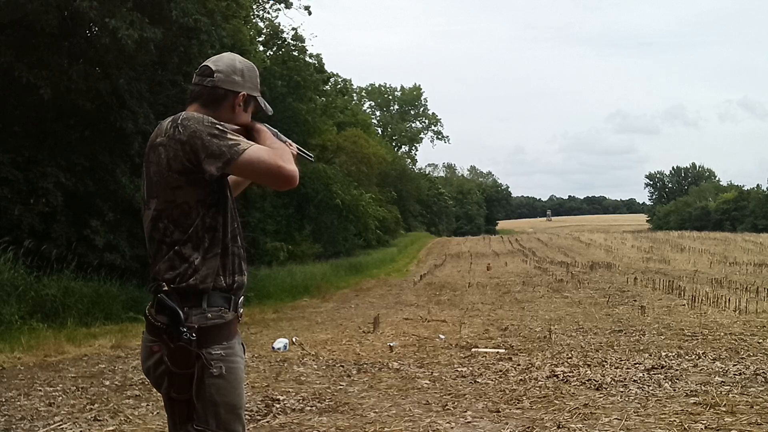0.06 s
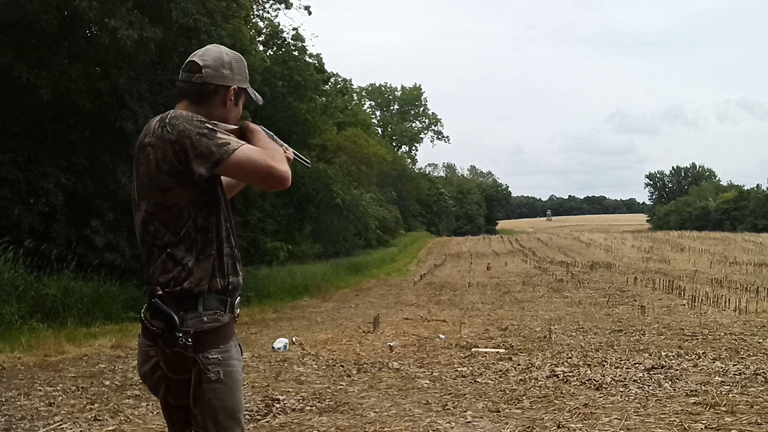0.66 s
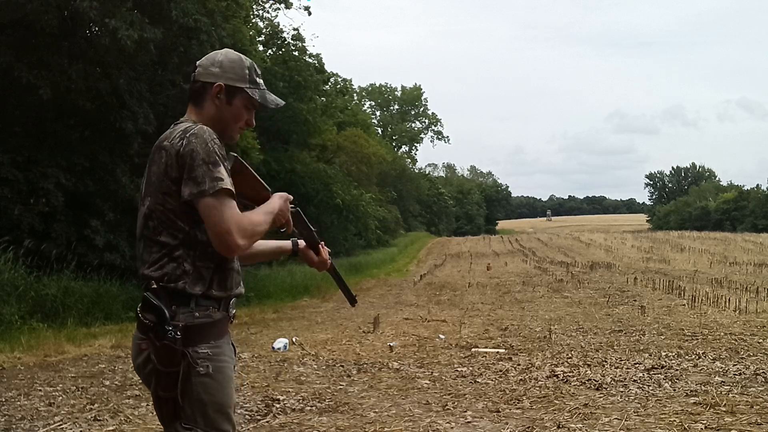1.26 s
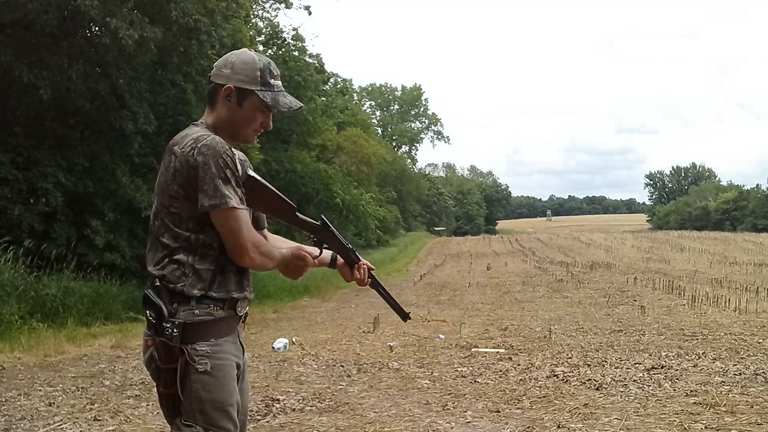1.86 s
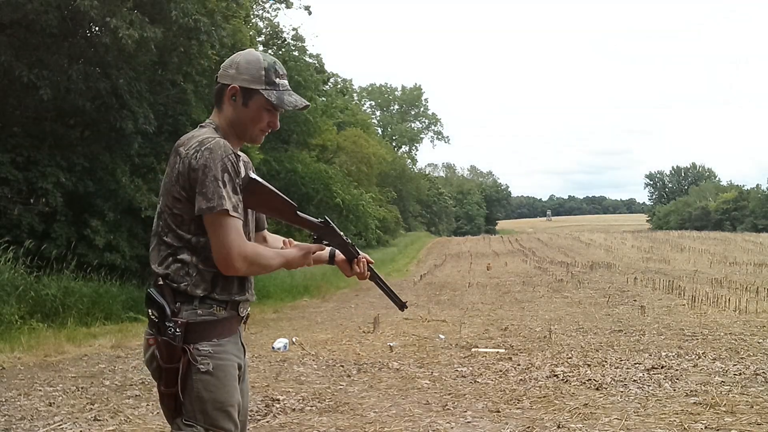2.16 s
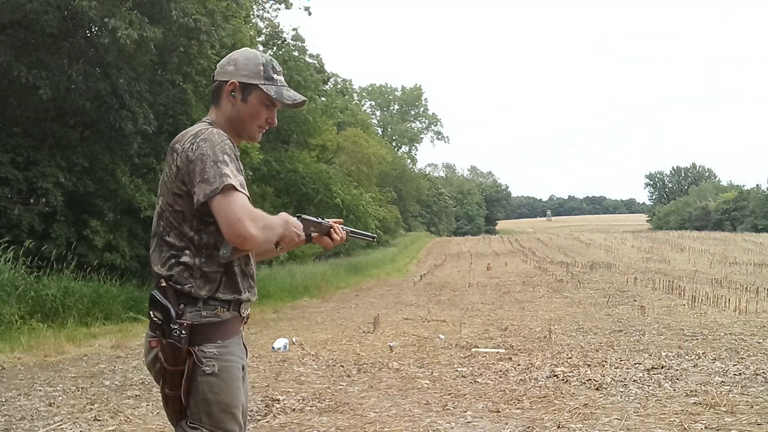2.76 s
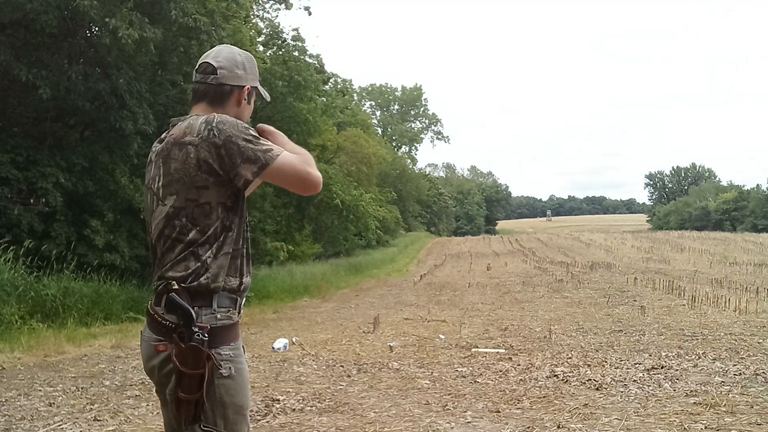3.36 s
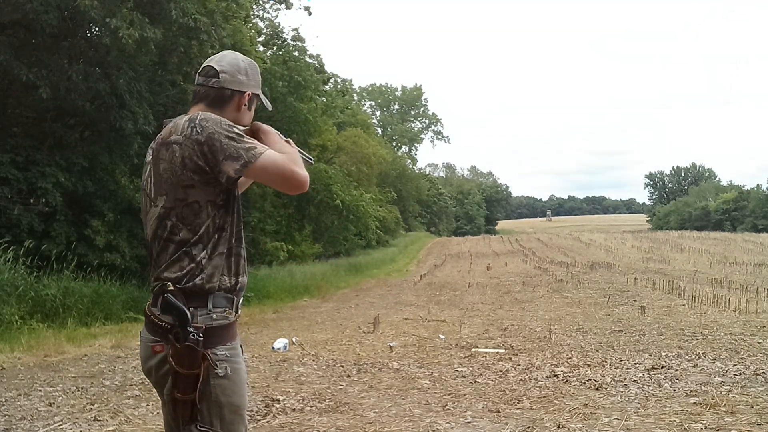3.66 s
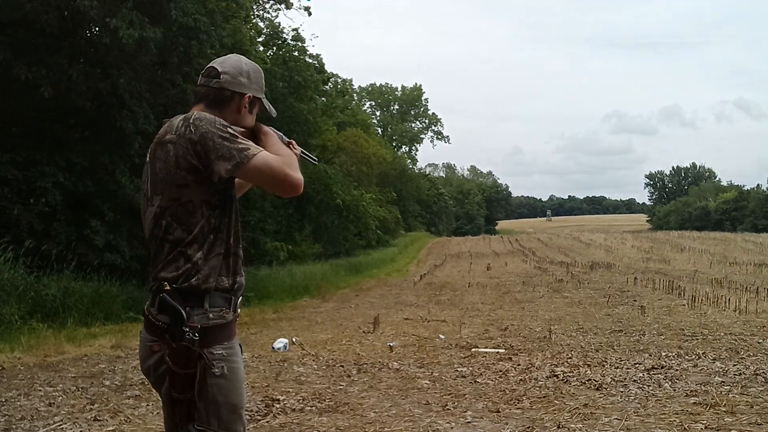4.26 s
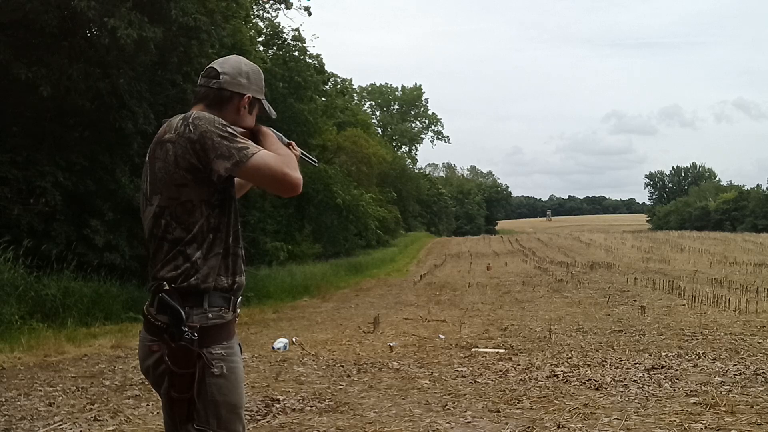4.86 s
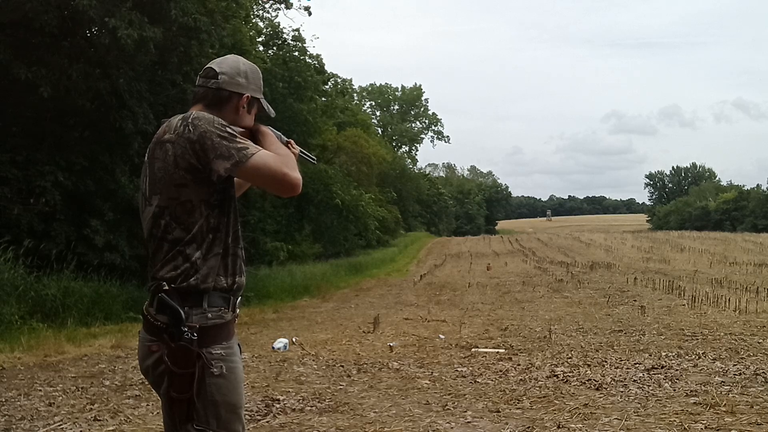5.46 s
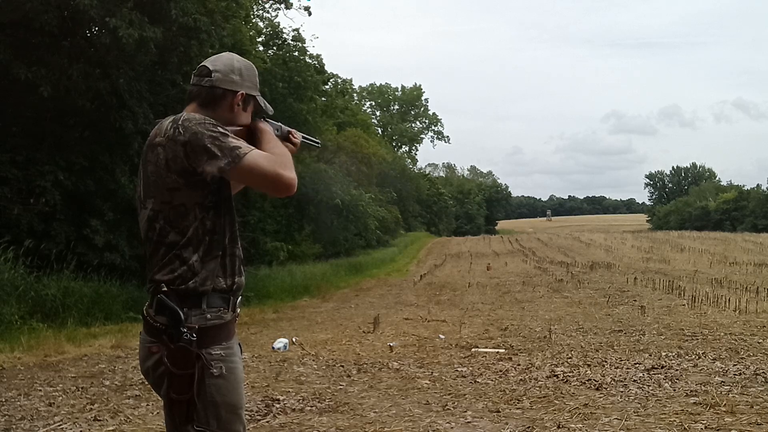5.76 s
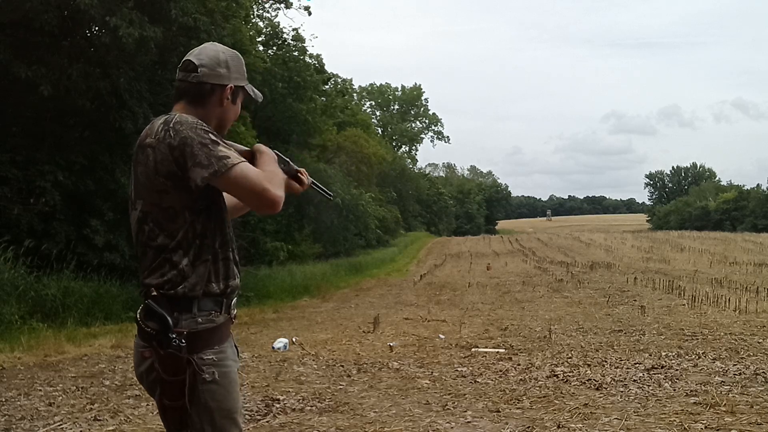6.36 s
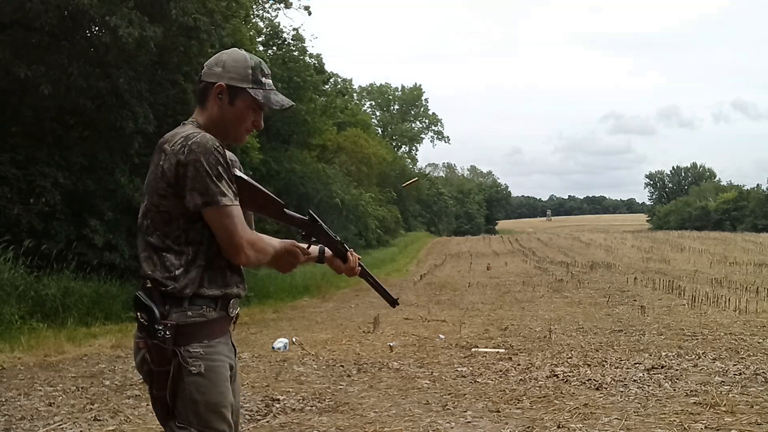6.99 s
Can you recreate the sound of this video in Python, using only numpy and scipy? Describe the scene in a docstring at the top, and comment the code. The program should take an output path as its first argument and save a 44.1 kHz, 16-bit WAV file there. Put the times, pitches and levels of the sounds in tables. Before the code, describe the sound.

Two lever-action rifle shots echo across an open field, each followed by metallic clacks of the lever and a ringing ejected case.

```python
"""Two lever-action rifle shots beside a wood

Each blast, fired in a stubble field, buffets the microphones, is thrown back by the trees and rolls away.
Then the lever is worked: steel knocks and scrapes, and the empty case rings as it flies out.
Sleeves rustle after the first shot. Gain control ducks the faint hiss at each shot and recovers slowly."""
import sys
import numpy as np
from scipy import signal
from scipy.fft import rfft, irfft, next_fast_len
from scipy.io import wavfile
from scipy.ndimage import uniform_filter1d, minimum_filter1d

SR = 44100
rng = np.random.default_rng(int(sys.argv[2]) if len(sys.argv) > 2 else 0)


def waveform_to_disk(signal):
    """Save audio, clipped to [-1, 1], as 16-bit WAV at the path in sys.argv[1]."""
    frames = np.transpose(np.atleast_2d(signal))
    scaled = np.clip(frames, -1, 1) * 32767
    samples = np.round(scaled).astype(np.int16)
    wavfile.write(sys.argv[1], SR, samples)


N = 318843
BINS = np.fft.rfftfreq(2048, 1 / SR)
# shots: t/s, blast gain/dB, echo gain/dB
SHOTS = [(0.143, 5.5, 6), (5.7052, 3.5, 5.5)]


def amp(db):
    """Decibels to gain."""
    return 10 ** (np.asarray(db) / 20)


def unit(x):
    """Scale to rms 1."""
    return x / np.sqrt(np.mean(x ** 2) + 1e-20)


def jitter(shape, span):
    """Noise smoothed over span points, rms 1."""
    return unit(uniform_filter1d(rng.standard_normal(shape), span))


def read(points, hz):
    """Interpolate a table over log frequency."""
    f, value = np.transpose(points)
    return np.interp(np.log(hz + 1), np.log(f + 1), value)


def add(mix, at_s, sound):
    """Mix in a stereo sound."""
    part = mix[:, round(at_s * SR):][:, :sound.shape[1]]
    part += sound[:, :part.shape[1]]


def pan(db):
    """Stereo gains for an L-R level difference."""
    return amp(np.array([db, -db]) / 2)


def place(x, balance):
    """Pan each frequency separately."""
    size = next_fast_len(x.shape[1])
    gains = pan(read(balance, np.fft.rfftfreq(size, 1 / SR)))
    return irfft(rfft(x, size) * gains, size)[:, :x.shape[1]]


def correlate(x, coherence):
    """Blend left noise into right."""
    return np.array([x[0], coherence * x[0] + np.sqrt(1 - coherence ** 2) * x[1]])


def noise(coherence, size):
    """Stereo white noise."""
    return correlate(rng.standard_normal((2, size)), coherence)


def colour(x, db):
    """Minimum-phase filter of unit energy, shaped by db on BINS."""
    log_gain = np.log(amp(np.r_[db, db[-2:0:-1]]))
    taps = np.fft.ifft(np.exp(np.conj(signal.hilbert(log_gain)))).real
    return signal.fftconvolve(x, taps[None] / np.linalg.norm(taps), axes=1)[:, :x.shape[1]]


def background(gain_db=-63):
    """Steady hiss of leaves and microphones over a low rumble."""
    # noise spectrum: f/Hz, density/dB
    spectrum = [(18, -38.5), (30, -9.5), (64, -2.5), (121, -7.5), (145, -12.5), (179, -10), (584, -16.5),
                (822, -16.5), (889, -16), (1320, -18), (2830, -14.5), (4650, -9), (8080, -19.5),
                (13300, -23), (16000, -24)]
    # balance: f/Hz, L-R/dB
    balance = [(60, 4.5), (180, 2.5), (550, 4), (1650, 9.5), (4970, 0.5), (15000, 13)]
    hiss = irfft(rfft(noise(0.1, N)) * amp(read(spectrum, np.fft.rfftfreq(N, 1 / SR))), N)
    return amp(gain_db) * place(unit(hiss), balance)


def sleeves(width_oct=0.35, side_db=2):
    """Cloth brushes the stock in soft swells as the rifle comes down."""
    # rustles: t/s, level/dB, half-width/s, centre/Hz
    rustles = [(1.189, -43.5, 0.079, 2600), (1.528, -56.5, .035, 3970)]
    out, t = np.zeros((2, N)), np.arange(N) / SR
    for at, db, width, centre in rustles:
        band_db = -20 * np.log10(1 + (np.log2((BINS + 20) / centre) / width_oct) ** 2)
        out += amp(db) * np.exp(-((t - at) / width) ** 2) * colour(noise(0.3, N), band_db)
    return pan(side_db)[:, None] * out


def field_scatter(x, near_db=-24, near_t60_s=0.17, far_db=-35, far_cut_hz=4400, far_rise_s=0.26):
    """Small sounds scatter off nearby stubble; their treble returns faintly from the deeper wood."""
    t = np.arange(SR // 4) / SR
    stubble = rng.standard_normal((2, len(t))) * amp(-60 * t / near_t60_s)
    near = signal.lfilter(*signal.butter(1, 7000, fs=SR), stubble)
    far = signal.lfilter(*signal.butter(3, far_cut_hz, "high", fs=SR), wood_echo())
    far *= np.minimum(np.arange(far.shape[1]) / SR / far_rise_s, 1) ** 2
    return sum(amp(db) * signal.fftconvolve(x, taps / np.linalg.norm(taps[0]), axes=1)[:, :N]
               for db, taps in ((near_db, near), (far_db, far)))


def cases(side_db=8, throb=0.43, rise_s=0.0079, wander_hz=32, shimmer_db=3.5):
    """Each brass case rings like a tiny bell; tumbling makes it throb and bends its pitch."""
    # ejections: t/s, gain/dB, tumble rate/Hz
    ejections = [(1.767, -16.5, 38.5), (6.918, -29, 33.8)]
    # brass modes: f/Hz, level/dB, t60/s
    modes = [(5240, -23.5, 0.44), (10900, -15, 0.34), (12270, 1.5, 0.27), (15030, -10, .2)]
    out, t = np.zeros((2, N)), np.arange(SR // 2) / SR
    for at, db, tumble_hz in ejections:
        for hz, mode_db, t60 in modes:
            phase = 2 * np.pi * rng.random((2, 1))
            wander, shimmer = jitter((2, len(t)), 400)
            ring = np.sin(2 * np.pi * np.cumsum(hz + wander_hz * wander) / SR + phase)
            envelope = amp(db + mode_db - 60 * t / t60 + shimmer_db * shimmer) * (1 - np.exp(-t / rise_s))
            tumble = 1 + throb * np.cos(2 * np.pi * tumble_hz * t + phase)
            add(out, at, pan(side_db)[:, None] * envelope * ring * tumble)
    return out


def contact_noise(size):
    """White noise of steel contact, alike in both channels except in the high treble."""
    # stereo likeness: f/Hz, coherence
    coherence = [(100, 0.86), (1400, .92), (3200, 1), (7000, 0.43), (14000, .05)]
    n = next_fast_len(size)
    white = rfft(rng.standard_normal((2, n)))
    return irfft(correlate(white, read(coherence, np.fft.rfftfreq(n, 1 / SR))), n)[:, :size]


def action_db(ring_db, uneven_db=0.5, ripple_db=3.5):
    """Response of the action: each contact excites its resonances in new proportions."""
    # steel action and wooden stock: f/Hz, density/dB
    body = [(60, -32), (250, -25.5), (600, -26), (1200, -13), (1800, -6.5), (3500, -1), (5000, -4.5),
            (8000, -12.5), (12000, -13), (16000, -18)]
    # resonances: f/Hz, width/Hz, level/dB
    modes = [(900, 100, -3.5), (992.7, 130, -8), (2020, 130, 2.5), (2247, 240, 6), (2622, 250, -0.5),
             (3410, 240, -2.5), (4000, 81, -7), (4830, 83, -5.5)]
    drives_db = ring_db - uneven_db * rng.standard_normal(len(modes))
    peaks = sum(amp(db + drive) ** 2 / (1 + (2 * (BINS - hz) / width) ** 2) ** 2
                for (hz, width, db), drive in zip(modes, drives_db))
    broad = amp(read(body, BINS) + ripple_db * jitter(len(BINS), 14))
    return 10 * np.log10(broad ** 2 + peaks)


def bolt_scrape(start_s, stop_s, stop_db, growth_db, grit_db=4.5, loose_s=0.18, settle_s=0.011):
    """The bolt catches and slips on its rails, speeding up to its stop; loose parts then settle."""
    t = np.arange(start_s, stop_s + loose_s, 1 / SR)
    slips = unit(amp(grit_db * jitter(len(t), 60)))
    to_go = np.maximum(stop_s - t, 0) / (stop_s - start_s)
    settle_db = 32.5 * np.log10(1 + np.maximum(t - stop_s, 0) / settle_s)
    push = amp(stop_db - growth_db * to_go - settle_db) * signal.windows.tukey(len(t), 0.04)
    return contact_noise(len(t)) * slips * push


def action(knock_db=-2, chatter_db=1.5, open_ring_db=3.5, shut_ring_db=-9, slide_ring_db=2):
    """Steel parts knock and scrape; the action rings when open and is damped when locked."""
    # lever, bolt and cartridge knocks: t/s, level/dB, treble/dB, decay/s
    knocks = [(1.392, -23, -0.5, 0.0052), (1.404, -26, -15, 0.0086), (1.6952, -23.5, -7, 0.0046),
              (1.7084, -6, -3.5, 0.003), (1.7376, -19.5, 8, 0.0066), (1.7577, -19, 14, 0.0067),
              (1.7762, -20.5, -1, .0038), (1.8255, -6.5, 4, 0.0047), (1.8784, -28.5, 9, 0.0079),
              (2.1265, -40, -3, 0.0056), (2.1442, -27.5, 6, 0.0098), (2.1811, -16.5, 0.5, 0.0063),
              (2.2003, -15.5, -21, 0.0022), (2.2225, -16.5, 12, 0.0046), (2.2412, -9, -13, 0.0025),
              (2.2525, -17, -10, 0.0098), (2.2886, -6.5, 0.5, 0.0055), (2.304, -21, -3, 0.0063),
              (2.3396, 1.5, -5, 0.00058), (2.3413, -11, -9, 0.0023), (2.8293, -47, -8, 0.0028),
              (6.6877, -22, -1, 0.0077), (6.704, -25, -10, 0.0042), (6.7302, -22, -8, 0.0042),
              (6.7524, -16, -6.5, 0.0033), (6.7797, -18.5, -2.5, .0019), (6.8663, -29.5, -5, 0.0029),
              (6.884, -26.5, 7, .005), (6.9035, -20, 13, 0.0039), (6.9135, -21, 9, .005),
              (6.9193, -5.5, -2.5, .0036), (7.0198, -35.5, 7, 0.0042), (7.2163, -32, 6, 0.0031)]
    # hammer, then firing pin: lead on the shot/s, level/dB, treble/dB, decay/s
    lock = [(.009, -24, -7, .0012), (.003, -24, -2.5, .0018)]
    # action open: from/s, to/s
    open_spans = [(1.70, 2.335), (6.86, 7.3)]
    # bolt strokes: start/s, stop/s, level at stop/dB, growth/dB
    strokes = [(1.713, 1.778, -34.5, -1.5), (1.802, 1.826, -22, 14.5), (2.157, 2.297, -23, 16),
               (6.884, 6.919, -22.5, 21)]
    # balance: f/Hz, L-R/dB
    balance = [(1000, 1.5), (4000, -1), (8000, 8), (15000, 8)]
    out, t = np.zeros((2, N)), np.arange(SR // 10) / SR
    treble = np.clip(np.log2((BINS + 1) / 2500) / 2, 0, 1)
    lock_knocks = [(shot[0] - lead, *blow) for shot in SHOTS for lead, *blow in lock]
    for at, db, treble_db, decay in knocks + lock_knocks:
        is_open = any(a < at < b for a, b in open_spans)
        ring_db = (open_ring_db if is_open else shut_ring_db) - 0.32 * treble_db  # blunt blows ring more
        envelope = np.exp(-t / decay) * (1 - np.exp(-t / (0.11 * decay)))
        bounces = amp(chatter_db * jitter(len(t), 16))
        chatter = unit(contact_noise(len(t)) * bounces * envelope) * np.sqrt(np.mean(envelope ** 2))
        add(out, at, amp(db + knock_db) * colour(chatter, action_db(ring_db) + treble_db * treble))
    for stroke in strokes:
        add(out, stroke[0], colour(bolt_scrape(*stroke), action_db(slide_ring_db) - 3 * treble))
    return place(out, balance)


def roll_db(t, peak_s=0.092, swell_db=10, spread_db_per_decade=12.5, fade_db_per_s=27):
    """Echoes swell until the wood's edge answers, then thin out to a faint far roll."""
    rise_db = swell_db * np.minimum(t / peak_s - 1, 0)
    late = np.maximum(t, peak_s)
    fall_db = spread_db_per_decade * np.log10(late / peak_s) + fade_db_per_s * (late - peak_s)
    far_db = -52.5 - t  # sinks 1 dB/s
    return np.maximum(rise_db - fall_db - 1, far_db)


def wood_echo(patch_db=2, flutter_db=0.56, crack_db=11, cracks_per_s=70, turn_at_s=0.11, turn_s=0.3):
    """Countless echoes off trunks and leaves, duller with distance; single trunks send back cracks."""
    # echo spectrum: f/Hz, density/dB
    spectrum = [(20, -24.5), (45, -8), (120, -3.5), (190, -6.5), (300, -3.5), (540, -3), (740, 0),
                (1000, 0.5), (1500, -0.5), (3800, 2.5), (6500, -1.5), (8200, -8), (13000, -5),
                (16000, -11.5)]
    # absorption by air and leaves: f/Hz, loss after 1 s/dB
    loss = [(30, 15.5), (120, -2.5), (300, -2), (600, 8), (1000, 2.5), (1500, 5.5), (2400, 5), (4500, 14),
            (8000, 23), (15000, 52.5)]
    # stereo likeness: f/Hz, coherence
    coherence = [(60, 1), (250, 0.7), (640, 0.38), (1400, 0.012)]
    # early echoes, low, from the field on the right: f/Hz, L-R/dB
    early_side = [(60, -6.5), (150, -8), (380, -4.5), (950, -2), (2380, 0.5), (5980, 0.0), (15000, 2.5)]
    # late echoes, bright, from the wood on the left: f/Hz, L-R/dB
    late_side = [(60, 1.5), (150, -0.5), (380, -1.5), (950, -1.5), (2380, -0.5), (5980, 2.5), (15000, 9)]
    # tree clumps: delay/s, boost/dB, half-width/s, centre/Hz
    clumps = [(0.084, 1.5, .018, 4500), (0.151, 5.5, 0.013, 1049), (0.221, 1, 0.028, 6430),
              (.45, 2.5, 0.1, 1000), (.605, 5, 0.022, 3000), (0.763, 4, 0.02, 2810)]
    size = int(2.5 * SR)
    cracks = amp(crack_db) * rng.choice([-1, 1], (2, size)) * (rng.random((2, size)) < cracks_per_s / SR)
    hz, t, z = signal.stft(rng.standard_normal((2, size)) + cracks, SR, nperseg=512)
    z = correlate(z, read(coherence, hz)[:, None])
    # trees answer in patches of pitch and time
    patches = uniform_filter1d(rng.standard_normal(z.shape[1:]), 5, axis=0)
    patches = unit(uniform_filter1d(patches, 4, axis=1))
    loss_db = read(loss, hz)[:, None] * t ** 0.81
    z *= unit(amp(read(spectrum, hz)))[:, None] * amp(patch_db * patches - loss_db)
    for at, db, width, centre in clumps:
        band = np.exp(-np.log2((hz + 1) / centre) ** 2)
        z *= amp(db * np.outer(band, np.exp(-((t - at) / width) ** 2)))
    late = np.clip((t - turn_at_s) / turn_s, 0, 1)
    z *= pan(np.outer(read(early_side, hz), 1 - late) + np.outer(read(late_side, hz), late))
    wash = signal.istft(z, SR, nperseg=512)[1][:, :size]
    wash *= np.minimum(np.arange(size, 0, -1) / SR / 0.2, 1)  # 0.2 s fade-out
    return wash * amp(roll_db(np.arange(size) / SR) + flutter_db * jitter(size, 250))


def thump(gain_db=-25, length_s=0.16, band_hz=(35, 150), side_db=-8):
    """The push of air buffets the microphones, the right one most."""
    size = int(length_s * SR)
    low = signal.sosfilt(signal.butter(2, band_hz, "band", fs=SR, output="sos"), noise(0, size))
    return amp(gain_db) * pan(side_db)[:, None] * unit(low) * signal.windows.tukey(size, 0.4)


def muzzle_blast(hold_s=0.0027, decay_s=0.0046, side_db=6.5, gain_db=-3):
    """A few milliseconds of ragged pressure, dying quickly."""
    # blast spectrum: f/Hz, density/dB
    spectrum = [(20, -34), (60, -5.5), (400, -10.5), (1300, -9.5), (2600, -2.5), (5000, 0.5), (8000, -12.5),
                (14000, -2), (16000, -3.5)]
    t = np.arange(SR // 8) / SR
    burst = noise(0.1, len(t)) * np.exp(-np.maximum(t - hold_s, 0) / decay_s)
    return amp(gain_db) * pan(side_db)[:, None] * colour(burst, read(spectrum, BINS))


def scene():
    """Background, sleeves, shots with echoes, action and cases."""
    out = background() + sleeves()
    for at, blast_db, echo_db in SHOTS:
        add(out, at, amp(blast_db) * muzzle_blast())
        add(out, at, amp(echo_db) * wood_echo())
        add(out, at, amp(echo_db) * thump())
    metal = action() + cases()
    return out + metal + field_scatter(metal)


def record(dry, threshold_db=-11.5, hold_s=0.41, recovery_db_per_s=7.5, band_hz=(42, 15850)):
    """Low cut; gain control that drops at once, holds and recovers slowly; clipping; band limit."""
    dry = signal.sosfilt(signal.butter(4, band_hz[0], "high", fs=SR, output="sos"), dry)
    power_db = 10 * np.log10(abs(uniform_filter1d((dry ** 2).mean(0), 200)) + 1e-12)
    half = int(hold_s * SR / 2)
    held_db = -minimum_filter1d(-power_db, 2 * half + 1, origin=half, mode="nearest")
    ramp_db = np.arange(N) / SR * recovery_db_per_s
    envelope_db = np.maximum.accumulate(held_db + ramp_db) - ramp_db
    duck_db = uniform_filter1d(np.maximum(envelope_db - threshold_db, 0), 40)
    clipped = np.clip(dry / amp(duck_db), -1, 1)
    low_pass = signal.firwin(511, band_hz[1], window=("kaiser", 9), fs=SR)
    return signal.oaconvolve(clipped, low_pass[None], "same")


dry = scene()
out = record(dry)
waveform_to_disk(out)
```